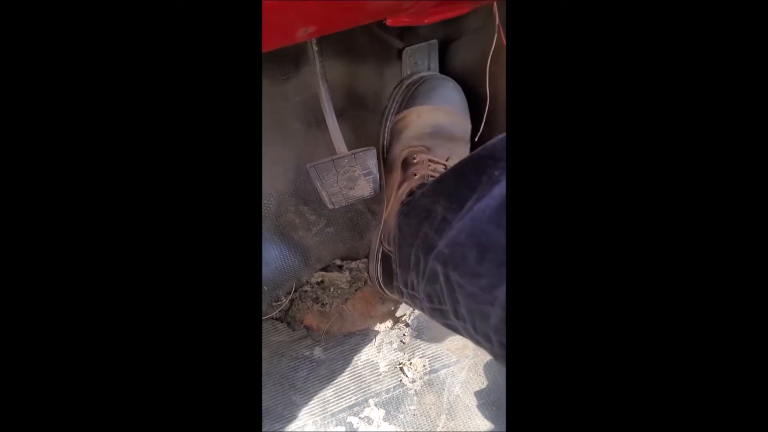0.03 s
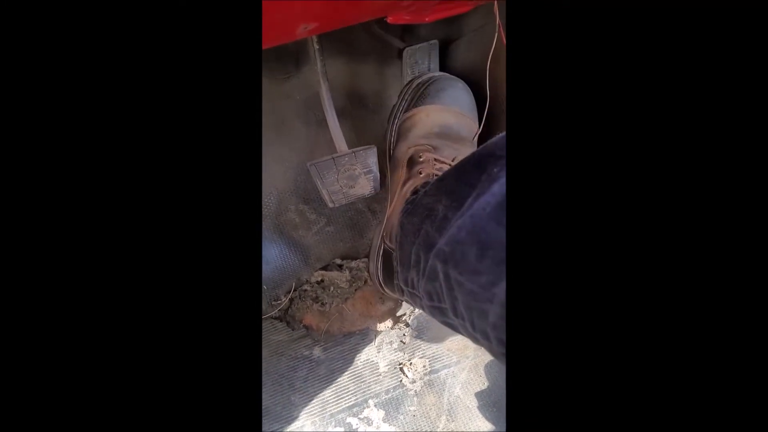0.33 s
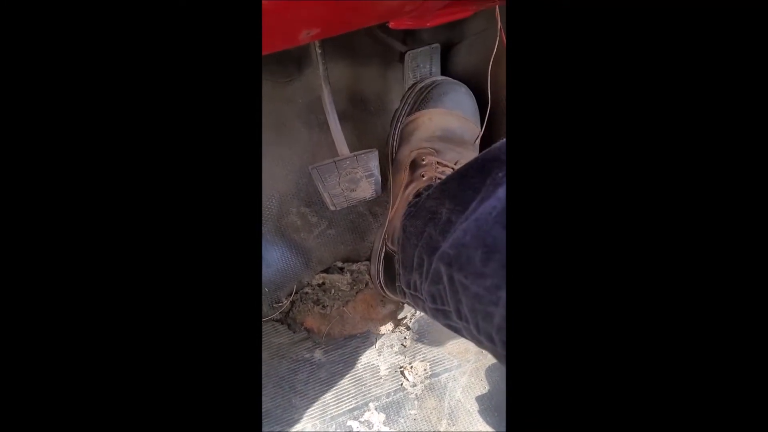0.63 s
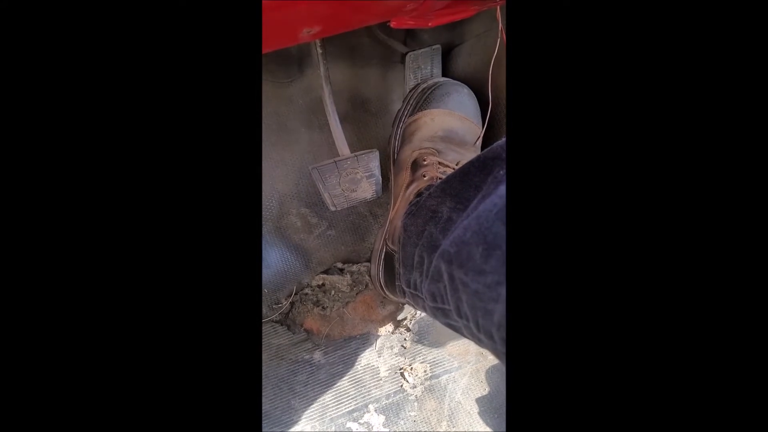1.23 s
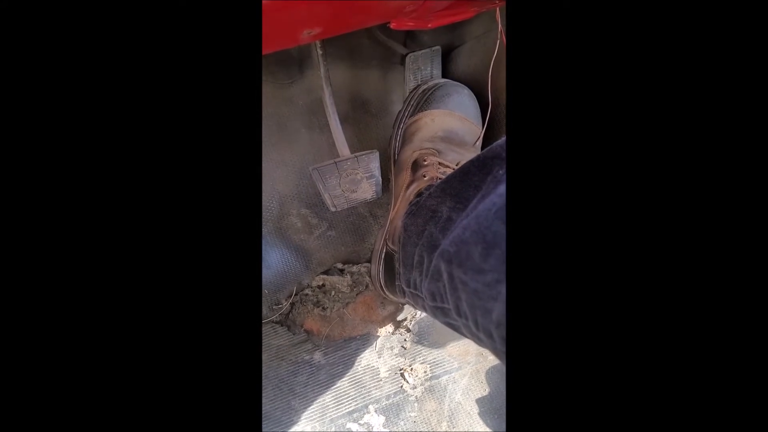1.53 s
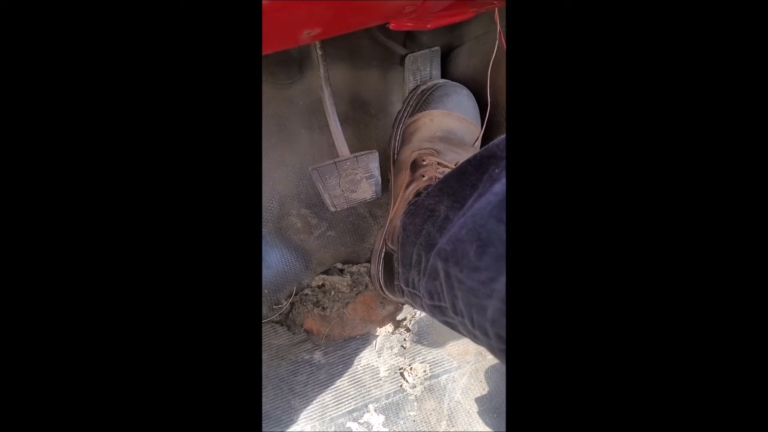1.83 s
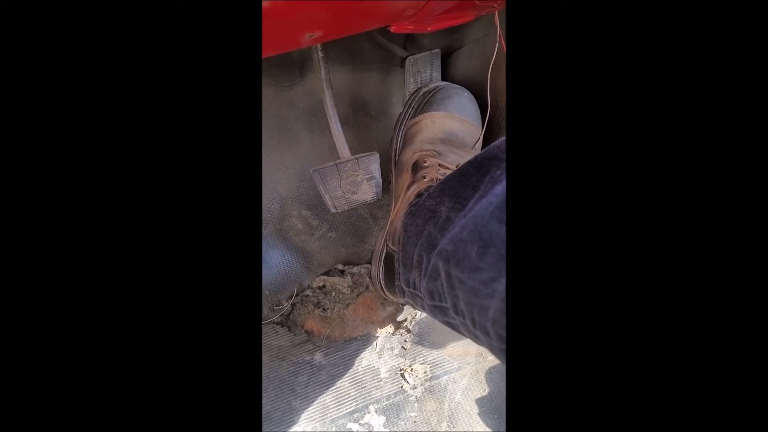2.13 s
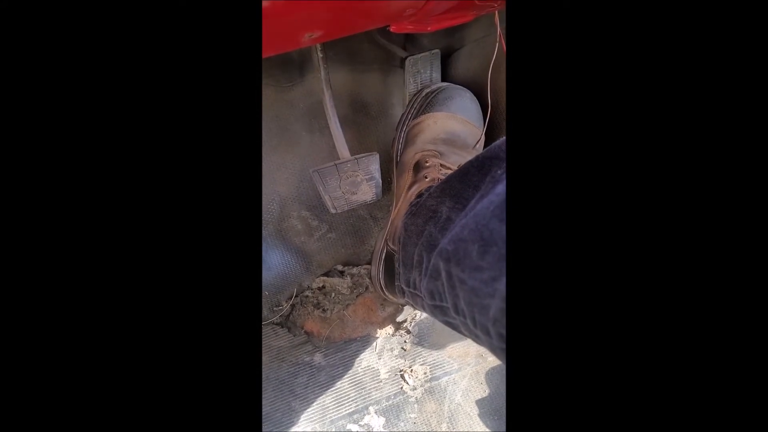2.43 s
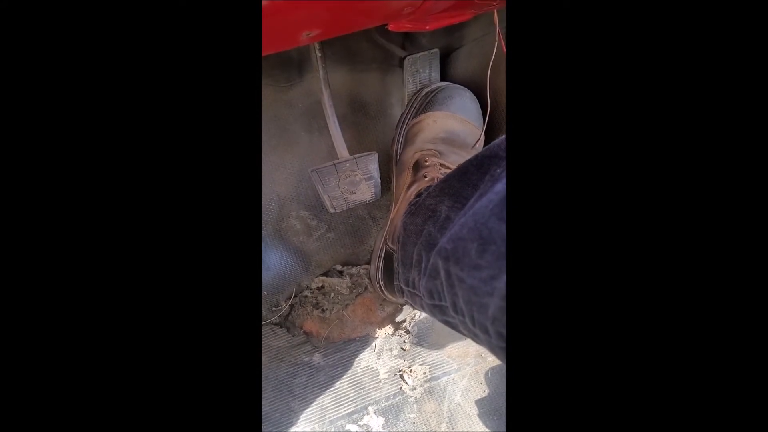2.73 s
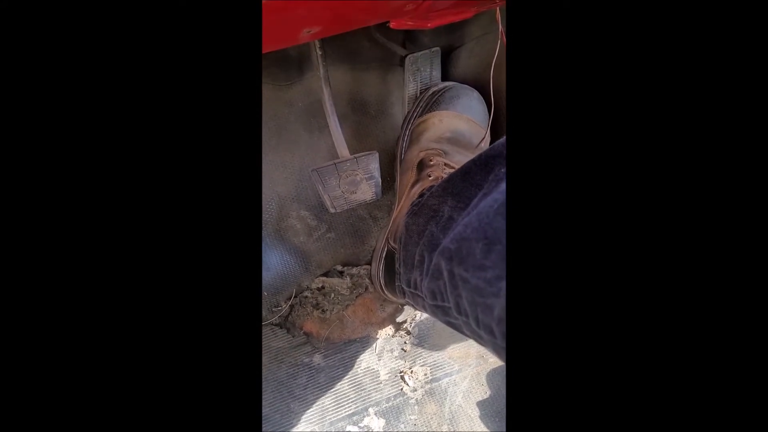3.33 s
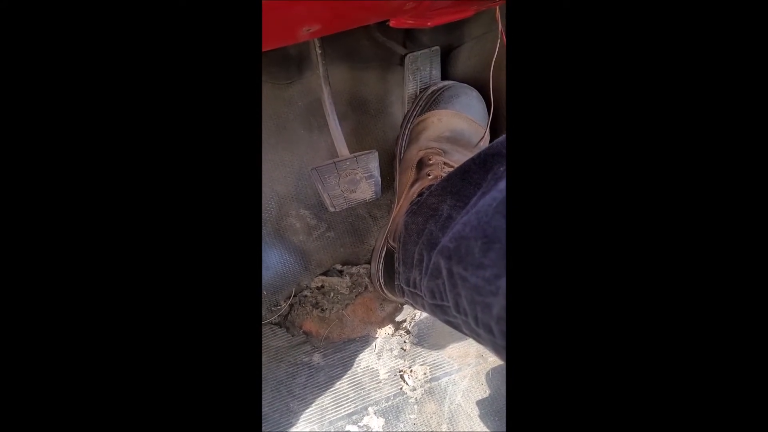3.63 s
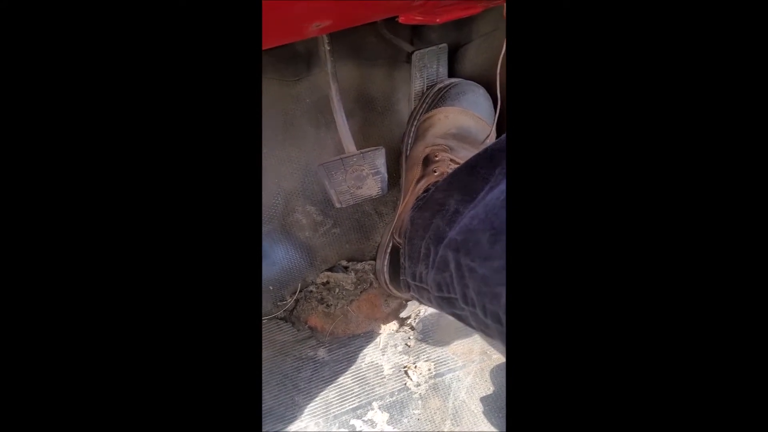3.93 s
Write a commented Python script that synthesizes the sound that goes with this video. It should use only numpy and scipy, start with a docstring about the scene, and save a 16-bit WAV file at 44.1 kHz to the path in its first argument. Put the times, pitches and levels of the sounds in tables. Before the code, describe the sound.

Boot scraping and clunking a metal pedal, with sharp clicks, inside a parked truck cab.

```python
"""A gritty scrape, crunchy clicks and a booming clunk: a boot works a pedal in a parked truck cab,
heard close up on a stereo microphone in the footwell. The sole slides, the metal linkage snaps in tiny
slips, and the pedal strikes the floor, leaving the cab's air throbbing. Thin whistles come and go;
light ticks and two soft knocks come near the end. Far outside, an engine revs over a faint rumble."""
import sys
import numpy as np
from scipy import signal
from scipy.fft import rfft, irfft
from scipy.io import wavfile
from scipy.ndimage import uniform_filter1d

SR = 44100
rng = np.random.default_rng(int(sys.argv[2]) if len(sys.argv) > 2 else 0)


def int16_out(signal):
    """Quantize to a 16-bit WAV file."""
    q = np.round(np.clip(np.atleast_2d(signal).T, -1, 1) * 32767)
    wavfile.write(sys.argv[1], SR, q.astype(np.int16))


N = 176400
T = np.arange(N) / SR
RIGHT_LAG_S, FLOOR_PAN_DB = 0.0004, -2


def from_db(db):
    """Decibels to gain."""
    return 10 ** (np.asarray(db) / 20)


def pan(db):
    """Left and right gains that make the left louder by db."""
    gains = from_db(np.array([[db], [-db]]) / 2)
    return gains / np.sqrt(np.mean(gains ** 2))


def in_time(rows):
    """The columns of a timed curve at every sample."""
    times, *columns = np.transpose(rows)
    return [np.interp(T, times, column) for column in columns]


def at_hz(points, hz):
    """A curve read on a log-frequency axis."""
    freqs, values = np.transpose(points)
    return np.interp(np.log(hz), np.log(freqs), values)


def noise(spectrum, band=None, rings=(), gritty=False):
    """Coloured stereo noise of rms 1, smooth or made of tiny slips; its treble reaches the left first."""
    # Each row: frequency in Hz, likeness of the microphone's two sides from 0 to 1.
    likeness = [(40, 0.92), (150, 0.98), (300, .85), (600, 0.6), (2500, 0.22)]
    slips_per_s, slip_spread_db, grit_share = 3700, 3, 0.97
    low_cut_hz, lag_above_hz = 33, 480
    white = rng.standard_normal((3, N))  # common, left, right
    if gritty:
        slips = (rng.random(N) < slips_per_s / SR) * rng.choice([-1, 1], N)
        slips = slips * from_db(slip_spread_db * np.minimum(rng.exponential(1, N), 4))
        white[0] = np.sqrt(1 - grit_share) * white[0] + np.sqrt(grit_share) * slips / slips.std()
    hz = np.maximum(np.arange(N // 2 + 1) * SR / N, 1)
    boost_db = sum(db / (1 + (2 * (hz - centre) / width) ** 2) for centre, width, db in rings)
    gain = from_db(at_hz(spectrum, hz) + boost_db) / np.sqrt(1 + (low_cut_hz / hz) ** 8)
    if band:
        gain /= np.sqrt((1 + (band[0] / hz) ** 10) * (1 + (hz / band[1]) ** 10))
    bins, alike = rfft(white), at_hz(likeness, hz)
    sides = np.sqrt(alike) * bins[0] + np.sqrt(1 - alike) * bins[1:]
    sides[1] *= np.exp(-2j * np.pi * hz * RIGHT_LAG_S / (1 + (lag_above_hz / hz) ** 2))
    out = irfft(sides * gain, N)
    return out / out.std()


def burst(start, attack, hold, t60):
    """A linear rise, and an exponential release that begins hold seconds after the start."""
    decay = np.log(1000) * np.maximum(T - start - hold, 0) / t60
    return np.clip((T - start) / attack, 0, 1) * np.exp(-np.minimum(decay, 20))


def taps(rows):
    """One hard impulse for each row."""
    force = np.zeros(N)
    for start, db in rows:
        force[int(start * SR)] += from_db(db)
    return force


def push(start, db, contact):
    """A half-sine force: the longer the contact, the duller the blow."""
    shape = np.sin(np.pi * np.clip((T - start) / contact, 0, 1))
    return from_db(db) * shape / shape.sum()


def struck(force, modes):
    """A force sets damped modes ringing, neighbours in opposite sense."""
    out = 0
    for k, (hz, db, t60) in enumerate(modes):
        radius, angle = np.exp(-np.log(1000) / (t60 * SR)), 2 * np.pi * hz / SR
        ring = signal.lfilter([.5, 0, -.5], [1, -2 * radius * np.cos(angle), radius ** 2], force + 1e-18)
        out += (-1) ** k * from_db(db) * ring
    return out


def resonate(x, rings):
    """Narrow resonances lift their own pitches and ring on after the sound that feeds them."""
    return x + sum((from_db(db) - 1) * signal.lfilter(*signal.iirpeak(hz, hz / width, fs=SR), x + 1e-18)
                   for hz, width, db in rings)


def background():
    """The cab's room tone: low rumble, faint hiss and a dull rush that dies after the first presses."""
    # Each row: time in seconds, level in dB.
    rumble_level = [(0, -52.5), (.43, -42.5), (.47, -44.5), (.66, -40), (.82, -50.5), (.9, -49.5),
                    (1.05, -58), (1.42, -63), (1.55, -58.5), (1.72, -47), (1.87, -57), (2.3, -58),
                    (2.62, -52.5), (2.85, -54), (3.25, -53.5), (3.6, -61.5), (4, -64)]
    rush_level = [(.34, -96), (.41, -52), (.5, -49), (.675, -59.5), (.70, -69.5), (1.2, -100)]
    # Each row: frequency in Hz, spectrum level in dB.
    rumble_colour = [(41, 1.5), (62, -1.5), (90, -9), (120, -4), (175, -11), (245, -4), (330, -13.5),
                     (480, -22), (650, -26), (1000, -53.5), (2000, -78)]
    rush_colour = [(300, -5), (500, -2.5), (590, 7), (660, -0.5), (730, 5), (850, -7.5), (1150, -5.5),
                   (1500, -20.5), (2600, -31.5), (3900, -31), (7000, -50.5)]
    hiss_colour = [(500, 11), (1000, 8.5), (1600, 5), (1950, 7.5), (2300, 0), (4000, -2.5), (6300, 3),
                   (9000, -2.5)]
    rumble = from_db(in_time(rumble_level)[0]) * noise(rumble_colour)
    rush = from_db(in_time(rush_level)[0]) * noise(rush_colour, gritty=True)
    return rumble + rush + from_db(-78) * noise(hiss_colour)


def distant_engine():
    """An engine revs far outside: only its firing tone and a weak overtone get into the cab."""
    # Each row: time in seconds, firing rate in Hz, level in dB.
    revs = [(.6, 165, -50), (.89, 122.3, -62.5), (.96, 116.1, -38.5), (1.1, 116.2, -70),
            (1.8, 101.2, -77.5), (2.05, 116.3, -43), (2.25, 130.8, -64), (2.5, 157.1, -40.5),
            (2.7, 168, -41), (2.87, 179.8, -48.5), (2.99, 170.1, -40), (3.12, 147.6, -46.5),
            (3.26, 119.3, -56), (3.39, 116.1, -45), (3.6, 117, -79.5)]
    overtone_db, flutter_db = -22.5, -1.4
    hz, db = in_time(revs)
    phase = 2 * np.pi * np.cumsum(hz) / SR
    flutter = np.interp(T, np.linspace(0, T[-1], 100), rng.standard_normal(100))
    return from_db(db + flutter_db * flutter) * (np.sin(phase) + from_db(overtone_db) * np.sin(2 * phase))


def whistles():
    """Thin, unsteady tones swell and fade, dead centre."""
    # Each row: midpoint in seconds, length in seconds, pitch in Hz, level in dB.
    tones = [(0.718, .15, 1913, -80), (1.005, 0.11, 1900, -79.5), (1.426, 0.31, 1900, -81.5),
             (1.54, 0.03, 3520, -51), (1.734, 0.16, 1950, -75.5), (1.902, 0.088, 3700, -79.5)]
    out = 0
    for middle, length, hz, db in tones:
        slow = signal.butter(2, 0.026 * hz, fs=SR, output="sos")
        waver = signal.sosfilt(slow, rng.standard_normal((2, N)))
        swell = np.exp(-np.minimum((2 * (T - middle) / length) ** 2, 20))
        phase = 2 * np.pi * hz * T
        out += from_db(db) * swell * (waver[0] * np.sin(phase) + waver[1] * np.cos(phase)) / waver.std()
    return out


def cab_drone():
    """The cab's air throbs at its resonance after the pedal moves, unsteady in pitch."""
    # Each row: time in seconds, level in dB.
    level = [(0, -59.5), (.44, -56.5), (.455, -29), (.52, -37), (.6, -33), (.68, -36), (.72, -41.5),
             (.78, -34.5), (.85, -47.5), (.9, -55), (1.2, -70), (1.55, -82), (1.62, -45), (1.85, -61),
             (2.3, -76), (4, -85.5)]
    # Each row: frequency in Hz, spectrum level in dB.
    colour = [(50, -21), (100, 2), (260, -7.5), (450, -32.5), (2000, -77)]
    # Each row: resonance in Hz, width in Hz, boost in dB.
    cab_rings = [(114.6, 66, 31), (250.2, 64, 20)]
    air = noise(colour, rings=cab_rings)
    power = uniform_filter1d(np.mean(air ** 2, axis=0), int(0.03 * SR))
    even_air = air / np.sqrt(power + 1e-9)
    return from_db(in_time(level)[0]) * even_air


def small_contacts():
    """The boot ticks on the pedal to the left; two soft knocks fall to the right, the second duller."""
    # Each row: start in seconds, level in dB.
    ticks = [(.050, -35), (.194, -42.5), (1.602, -40.5), (3.149, -39), (3.505, -65.5), (3.607, -63)]
    # Each row: start in seconds, level in dB, contact time in seconds.
    knocks = [(3.7462, -39.5, 0.000087), (3.8138, -44.5, .0005)]
    # Each row: frequency in Hz, level in dB, seconds to fall 60 dB.
    tick_modes = [(1560, -1.5, .014), (1900, -3.5, .035), (2420, -8, .02)]
    knock_modes = [(241, 2.5, 0.075), (398, 2, 0.049), (2225, -13.5, 0.031), (4580, -16, 0.031)]
    knock_force = sum(push(*row) for row in knocks)
    return pan(-4.5) * struck(knock_force, knock_modes) + pan(7) * struck(taps(ticks), tick_modes)


def sole_scrapes():
    """The dusty sole slides close by: each stroke swells and fades as low rub, grit and hiss."""
    # Each row: peak time, time to rise 20 dB and to fall 20 dB in seconds, then rub, grit and hiss in dB.
    strokes = [(.004, 0.011, 0.042, -31.5, -49.5, -56.5), (0.076, 0.045, 0.053, -36, -38, -48.5),
               (0.158, 0.028, 0.09, -26.5, -51, -52), (.30, 0.18, 0.25, -56.5, -58, -63),
               (0.409, 0.074, 0.035, -40.5, -40.5, -45), (1.547, 0.041, 0.073, -36.5, -43.5, -46),
               (1.598, 0.036, 0.082, -33, -49.5, -66), (2.911, 0.054, .04, -47, -56, -54),
               (3.003, 0.099, 0.11, -44, -49.5, -47.5), (3.161, 0.12, 0.11, -53.5, -56.5, -58),
               (3.55, 0.12, 0.22, -66, -77, -95), (3.83, 0.038, 0.04, -71, -66.5, -98),
               (3.99, 0.13, 0.081, -59, -69.5, -70.5)]
    # Each row: frequency in Hz, spectrum level in dB.
    colour = [(100, 16.5), (280, 5.5), (500, -2.5), (900, 5.5), (1500, 0), (2400, -2), (3000, -7),
              (3650, -2), (4500, -10), (7000, -9), (9200, -16.5), (12000, -12), (16000, -13)]
    edges_hz = [90, 500, 2500, 17000]
    out = 0
    for k, pan_db in enumerate([FLOOR_PAN_DB, 3, 3]):
        power = 0
        for peak, rise, fall, *levels_db in strokes:
            drop_db = 20 * np.maximum((peak - T) / rise, (T - peak) / fall)
            power += from_db(levels_db[k] - np.minimum(drop_db, 200)) ** 2
        out += pan(pan_db) * np.sqrt(power) * noise(colour, edges_hz[k:k + 2], gritty=True)
    return out


def floor_clunks():
    """The pedal's dull blows ring the floor panel, and the cab booms after each."""
    # Each row: start in seconds, level in dB, contact time in seconds.
    clunks = [(.043, -23, 0.0011), (0.049, -10.5, 0.0029), (.070, -21, 0.00034), (0.144, -23, 0.0035),
              (0.158, -45, 0.0013), (0.445, -25.5, 0.0081), (1.553, -34.5, 0.0015), (1.577, -26.5, 0.0033),
              (1.592, -30, 0.0034), (2.921, -32.5, 0.0019), (3.027, -38, 0.002), (3.051, -28, 0.0053),
              (3.170, -39.5, 0.0022), (3.182, -37.5, 0.0039)]
    # Each row: frequency in Hz, level in dB, seconds to fall 60 dB.
    panel_modes = [(41, -22.5, 0.26), (88, -15, 0.21), (123.8, -2.5, 0.16), (164, -0.5, 0.08),
                   (219.2, -2, 0.15), (266, -9, 0.15), (326, -8, 0.18), (365, -5, 0.24), (446.7, -14, 0.34),
                   (728, -13.5, .11), (770, -14.5, .07)]
    # Each row: frequency in Hz, spectrum level in dB.
    boom_colour = [(42, 7.5), (70, -2), (120, -1.5), (250, 2.5), (370, -1), (500, -11.5), (800, -33),
                   (1500, -47)]
    panel = struck(sum(push(*row) for row in clunks), panel_modes)
    boom_power = sum((from_db(db) * burst(start, attack=0.0087, hold=0, t60=0.36)) ** 2
                     for start, db, _ in clunks)
    boom = from_db(-12.5) * np.sqrt(boom_power) * noise(boom_colour)
    return pan(FLOOR_PAN_DB) * (panel + boom)


def pedal_stop():
    """The pedal cracks against its stop, left of the microphone; at other jolts its arm rings."""
    # Each row: start in seconds, level in dB.
    cracks = [(1.571, -17.5)]
    jolts = [(.041, -34.5), (.134, -38), (3.171, -42.5)]
    # Each row: frequency in Hz, level in dB, seconds to fall 60 dB.
    crack_modes = [(700, -3, 0.017), (920, 2, 0.013), (1320, 1.5, 0.013), (2560, -10, 0.0063),
                   (4730, -10, 0.0077)]
    arm_modes = [(2417, -14, 0.17), (2900, -19, 0.27), (3930, -2.5, 0.097), (4020, -3, 0.07),
                 (5450, -13.5, 0.04), (7540, -6.5, 0.07), (11900, -2.5, .045)]
    left = struck(taps(cracks), crack_modes)
    right = np.interp(T - RIGHT_LAG_S, T, left)
    return pan(10) * np.array([left, right]) + struck(taps(jolts), arm_modes)


def linkage_clicks():
    """Close up, brief runs of dense slips ring the metal linkage, each with a short tail in the cab."""
    # Each row: start and length in seconds, four band levels in dB from low to high, left over right in dB.
    clicks = [(0.039, 0.004, -43, -40.5, -32, -31, 4), (0.066, 0.01, -38, -46, -46.5, -64.5, 0),
              (0.132, 0.0077, -46.5, -52, -38, -37.5, 3), (0.182, 0.0061, -59, -50, -48, -68, 2),
              (0.278, 0.0028, -56, -50, -59, -68, 16.5), (0.336, 0.011, -49, -34, -45.5, -50.5, 9.5),
              (0.361, 0.0077, -51.5, -45, -47.5, -44.5, 10), (0.377, 0.0028, -65, -40.5, -34, -34.5, 2.5),
              (0.418, 0.026, -45, -56.5, -75, -74, 6), (0.467, 0.001, -54, -55.5, -55.5, -60, 5.5),
              (1.565, 0.0078, -36.5, -33, -28.5, -32.5, 3), (1.662, 0.0012, -54.5, -54.5, -62, -63, 3.5),
              (1.678, 0.00085, -69, -59, -59, -66, 9), (1.855, 0.0053, -66.5, -67.5, -86, -87, 11),
              (1.993, 0.0012, -66, -67, -77.5, -87, 9), (2.365, 0.0046, -96, -91, -69.5, -66.5, -4),
              (2.897, 0.016, -53, -43, -43.5, -40.5, 8), (2.913, 0.0077, -44, -39.5, -31.5, -30.5, 0.5),
              (2.921, 0.0096, -32.5, -33.5, -43, -47, 8), (3.028, 0.0069, -52, -31.5, -29, -30, 4.5),
              (3.034, 0.0047, -39, -31.5, -24.5, -25.5, 2.5), (3.148, 0.0008, -39, -42, -45.5, -50, 15.5),
              (3.167, 0.0088, -36, -33, -26.5, -29, 4), (3.746, .002, -77, -58, -71, -71, -1)]
    # Each row: frequency in Hz, spectrum level in dB.
    colour = [(450, 6.5), (650, 4.5), (1100, 1), (1500, 4.5), (2400, 0.5), (3200, -0.5), (4500, -0.5),
              (8000, -4.5), (9200, -9.5), (11000, -4), (15500, -3)]
    # Each row: resonance in Hz, width in Hz, boost in dB.
    metal_rings = [(1956, 57, 7.7), (3940, 87, 8), (4270, 170, 9.5), (4900, 120, 7), (5680, 60, 8.5),
                   (6220, 170, 10.5), (7630, 330, 6.5), (11150, 200, 6)]
    edges_hz, attack_s = [450, 1100, 3000, 8000, 17000], 0.0027
    tail_db, tail_t60_s = [-10, -10, -17.5, -13], [0.078, 0.14, 0.12, 0.092]
    out = 0
    for k in range(4):
        direct_power = tail_power = 0
        for start, length, *levels_db, pan_db in clicks:
            gain = from_db(levels_db[k]) * pan(pan_db)
            direct_power += (gain * burst(start, attack_s, length, t60=0.04)) ** 2
            tail_power += (gain * burst(start, length + attack_s, length, tail_t60_s[k])) ** 2
        band = edges_hz[k:k + 2]
        slips, air = noise(colour, band, gritty=True), noise(colour, band)
        drive = np.sqrt(direct_power) * slips + from_db(tail_db[k]) * np.sqrt(tail_power) * air
        out += resonate(drive, metal_rings) / resonate(air, metal_rings).std()
    return out


def scene():
    """Everything heard from the footwell: boot and pedal near, the cab around, the engine far off."""
    near = linkage_clicks() + pedal_stop() + floor_clunks() + sole_scrapes() + small_contacts()
    return near + cab_drone() + whistles() + distant_engine() + background()


def record(dry):
    """The microphone drops the deepest bass, and the top is cut steeply."""
    low_cut_hz, top_hz = 27, 15900
    thinned = signal.sosfilt(signal.butter(4, low_cut_hz, "high", fs=SR, output="sos"), dry)
    return signal.sosfilt(signal.ellip(10, .2, 70, top_hz, fs=SR, output="sos"), thinned)


dry = scene()
out = record(dry)
int16_out(out)
```